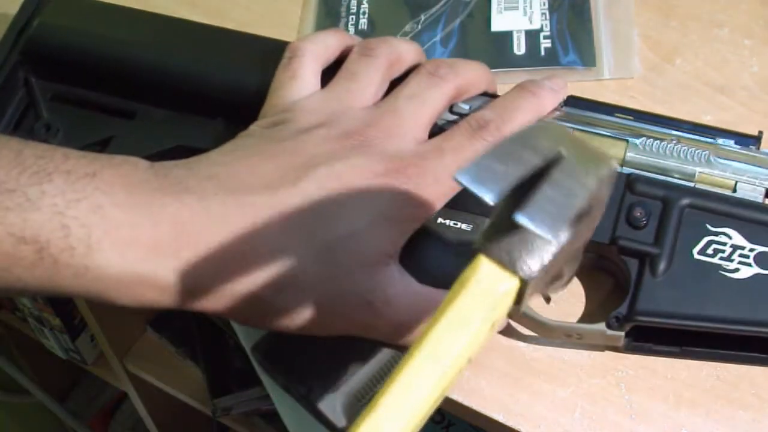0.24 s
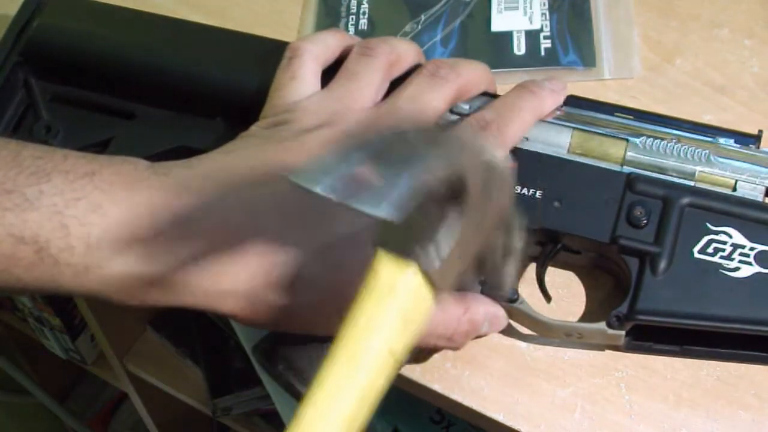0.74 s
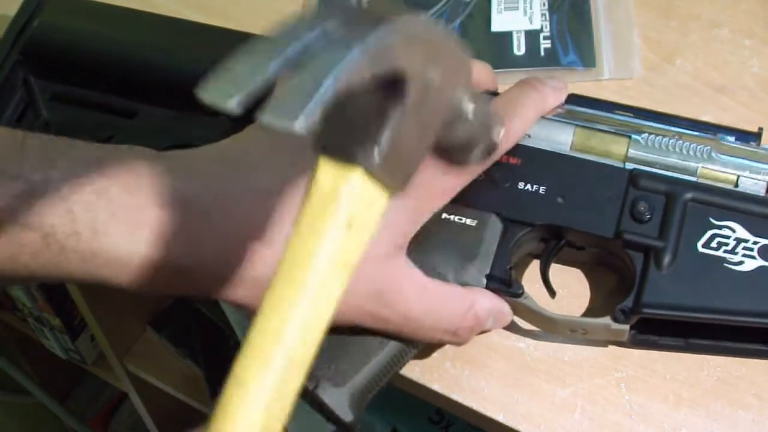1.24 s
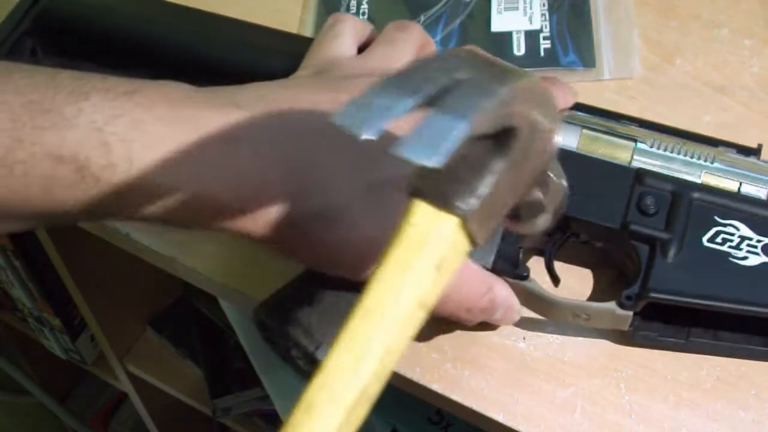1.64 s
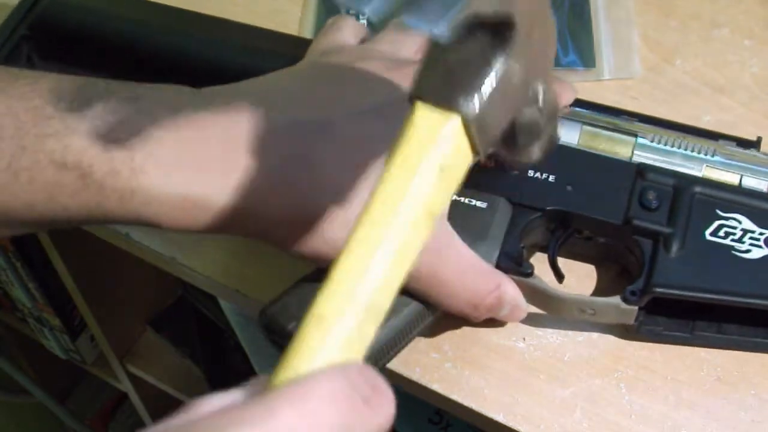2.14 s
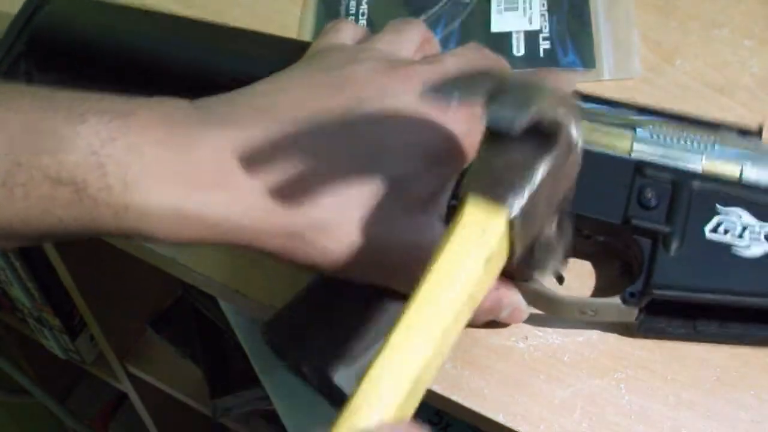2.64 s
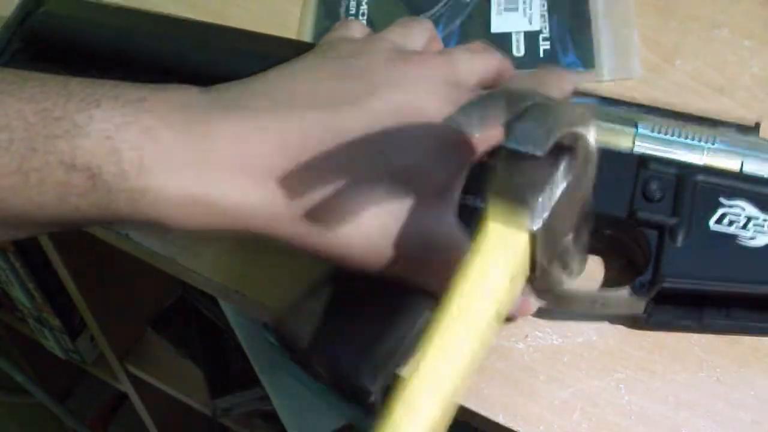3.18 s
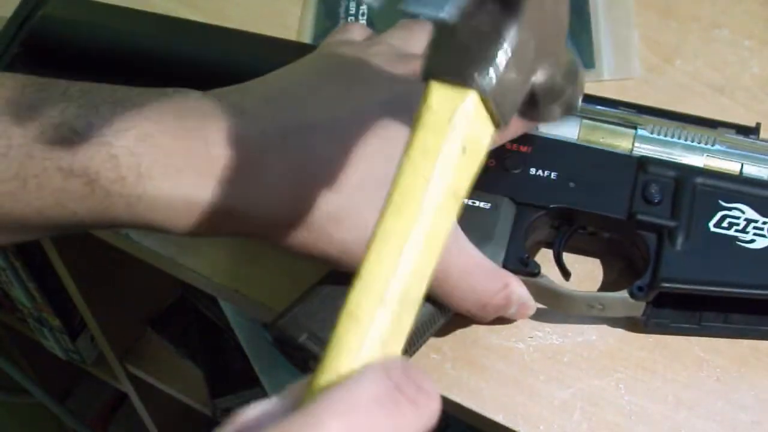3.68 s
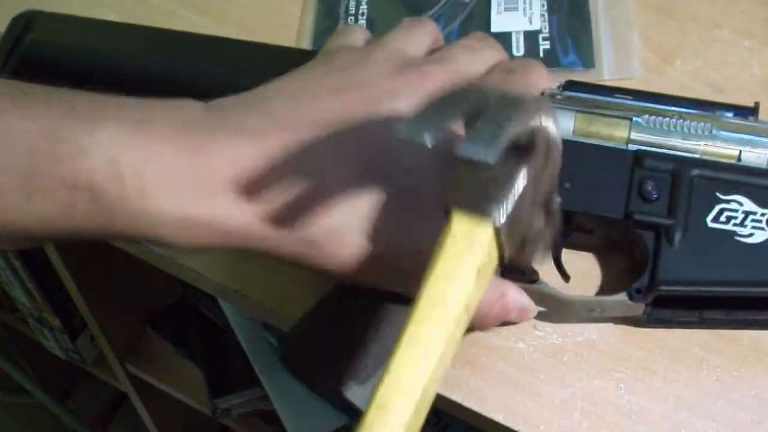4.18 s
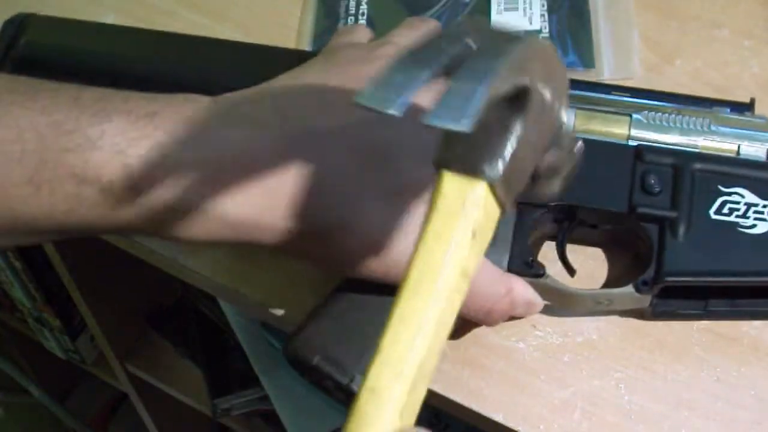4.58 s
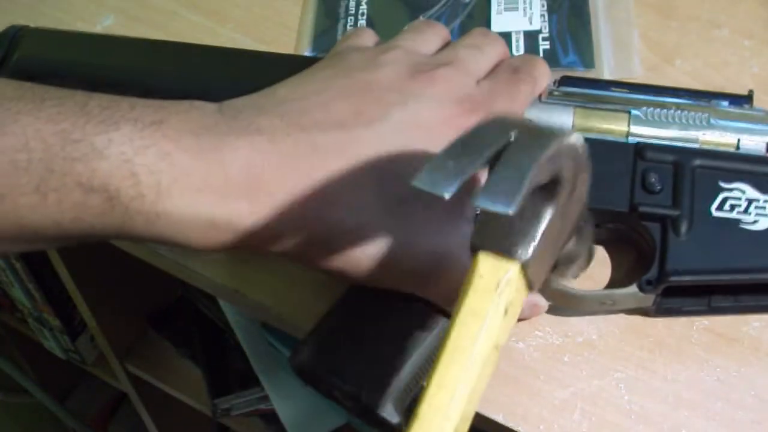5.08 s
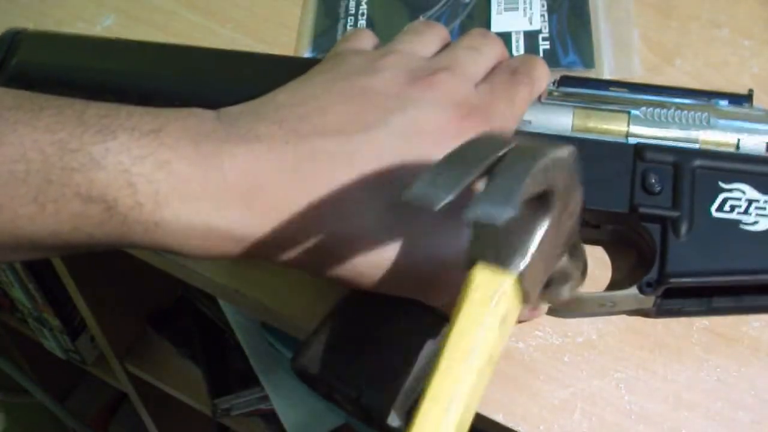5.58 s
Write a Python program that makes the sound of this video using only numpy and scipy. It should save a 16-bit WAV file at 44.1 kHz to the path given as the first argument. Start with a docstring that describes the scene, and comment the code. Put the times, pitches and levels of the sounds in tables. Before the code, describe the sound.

A hammer drives a steel pin into a plastic housing held on a wooden workbench. Each blow is a hard steel tick, a plastic clack and a short bench thump, with a thin metal ring, a chatter of loose parts and a faint knock as the housing lands again.

Four blows fall at about 0.4, 0.7, 1.0 and 1.4 seconds, the third strongest. In a short pause, a hand softly rubs and nudges the housing. From 1.9 seconds the hammering resumes lightly and keeps steady at about three blows a second, growing firmer and more ringing between 3.1 and 4.4. A soft nudge precedes the two hardest strikes, at 4.7 and 4.9. Three more follow, easing slightly, the last at 5.8.

The microphone is close and overloads on the blows. The room is small, with a short echo and a faint hum.

```python
"""Hammering a pin into plastic

A claw hammer drives a steel pin into a plastic housing that a hand holds down on a wooden bench.
Each blow is a steel tick, a clack of the housing and a thump of the bench top. Metal rings, loose
parts chatter, and the housing hops and lands again. Now and then the hand rubs and nudges it.
The room is small and hums faintly; the blows overload the close microphone."""
import sys
import numpy as np
from scipy import signal
from scipy.fft import rfft, irfft
from scipy.io import wavfile

SR = 44100
rng = np.random.default_rng(int(sys.argv[2]) if len(sys.argv) > 2 else 0)


def to_wav(sig):
    """Store sig (one row per channel, or 1-D mono) as 16-bit WAV at the path in sys.argv[1].

    Samples outside -1..1 are clipped; the rate is SR.
    """
    pcm = np.clip(np.atleast_2d(sig), -1, 1) * 32767
    pcm = np.round(pcm).astype(np.int16)
    wavfile.write(sys.argv[1], SR, pcm.T)  # frames by channels


N = 256662
T = np.arange(SR // 4) / SR  # seconds within one blow

# The hammer blows. Drive is the shove into the housing; hop is the time until it lands again.
# start_s, force_db, drive_db, metal_ring_db, thump_pitch_hz, hop_s, landing_db
BLOWS = [(0.4257, -5.5, -3, -41.5, 113.7, 0.039, -37.5), (0.7170, -2.5, 3.5, -45.5, 104, 0.065, -27),
         (1.0315, 2, 6.5, -39.5, 107, 0.086, -29.5), (1.3575, -4, -1.5, -32.5, 94.2, .053, -26),
         (1.9172, -5.5, -5, -49, 110.5, 0.048, -32), (2.234, -4.5, -4.5, -41.5, 108.5, 0.077, -26.5),
         (2.5328, -2, -2.5, -39, 112, 0.087, -28), (2.829, -4.5, -1.5, -34, 113, 0.082, -30.5),
         (3.136, 0.5, -2, -32, 114.4, 0.075, -29), (3.4425, -0.4, -1.9, -28.5, 118, 0.071, -28),
         (3.77, .5, -2.4, -28, 116.7, 0.048, -37.5), (4.0870, 1.1, -8, -29, 100.2, .051, -26),
         (4.3714, 1.5, -7.5, -28, 124, 0.044, -26), (4.6689, 8.5, 5.5, -41.5, 100.7, 0.051, -29.5),
         (4.9465, 10.5, 7.5, -37, 103.4, 0.047, -28), (5.212, 4.5, 7, -36, 108, .05, -33),
         (5.4908, 2.3, 5.5, -39, 101.5, 0.041, -37), (5.7767, 1.5, 3, -35, 99.5, .05, -31)]


def hammering():
    """The hammer strikes the pin, and the blow travels through the housing into the bench."""
    # The housing clacks as the pin shoves it, then as it is pressed onto the bench: delay_s, level_db
    clacks = [(.0007, -3), (.0055, -3)]
    out = np.zeros(N)
    for start_s, force_db, drive_db, metal_db, pitch_hz, _, _ in BLOWS:
        thump_s = 0.012 * np.exp(-0.012 * drive_db)  # more drive, shorter thump
        bench = thump(thump_level(force_db, drive_db), pitch_hz, thump_s)
        loose = clatter(-23.5 + force_db + 0.45 * drive_db)
        add(out, start_s, tick(force_db - 8) + jingle(metal_db + 7.5) + loose + bench)
        for delay_s, level_db in clacks:
            add(out, start_s + delay_s, clack(drive_db + level_db - 6, tilt=0.1 * drive_db))
    return out


def tick(level_db, chatter=0.25, chatter_s=0.016):
    """Steel meets steel: one hard contact and a few milliseconds of chatter on the pin."""
    # Tone of steel on steel: pitch_hz, level_db
    steel_tone = [(200, -13), (450, 4.5), (900, 3), (1900, 1), (2600, 9.5), (3200, 0), (4000, -25.5),
                  (5000, -17.5), (5700, -7.5), (7600, 3), (9300, -13), (12000, -16), (16000, -15.5)]
    contact = chatter * rng.standard_normal(len(T)) * dying(chatter_s)
    contact[0] += 1
    return levelled(signal.fftconvolve(contact, click(steel_tone))[:len(T)], level_db, samples=130)


def clack(level_db, tilt, rasp=0.78, rasp_s=0.052, ring_s=0.038, rise_s=0.0024):
    """The housing rings briefly, its tones shifting a little with the grip, and the sliding pin rasps."""
    # Tones of the plastic housing: pitch_hz, level_db
    housing_tones = [(232, -1.5), (345, -0.5), (495, 3.5), (600, 1.5), (890, -6.5), (1020, -3), (1180, -6),
                     (1390, -20), (1535, -17), (1712, -15), (2050, 0.5), (2320, 3), (2680, -7.5),
                     (3050, -7.5), (3600, -15), (4500, -20.5)]
    # Plastic scraping on steel: pitch_hz, level_db
    scrape_tone = [(120, -14.5), (400, 0), (900, -8), (1400, -5.5), (2500, -3.5), (3200, -16.5),
                   (4300, -23.5), (16000, -40.5)]
    ring = np.zeros(len(T))
    for pitch_hz, tone_db in housing_tones:
        detune, uneven_db = rng.standard_normal(2) * (0.013, 4)
        phase = pitch_hz * (1 + detune) * T + rng.random()
        ring += amp(tone_db + uneven_db) * np.sin(2 * np.pi * phase)
    ring = evened(tilted(ring, tilt)) * dying(ring_s)
    slide = evened(tilted(noise(scrape_tone, len(T)), tilt)) * dying(rasp_s)
    fade_in = 1 - np.exp(-(T / rise_s) ** 2)
    return levelled((ring + rasp * slide) * fade_in, level_db, samples=600)


def jingle(level_db, haze_s=0.135, ring_s=0.16):
    """Metal parts ring: a few clear tones that shift with how the pin sits, over a haze of many more."""
    # Tones of the steel pin and spring: pitch_hz, level_db
    steel_tones = [(5420, -4.5), (5720, -4.5), (5900, -4.5), (6100, -5.5), (7600, -1), (7950, -1),
                   (8270, -2)]
    # The haze of close-packed metal tones: pitch_hz, level_db
    haze_tone = [(1500, -18), (2500, -4), (3500, -11), (4700, -19.5), (5350, -1.5), (5850, -2), (6500, -2),
                 (7200, -2), (8150, 5), (9200, -7), (11000, -6), (13000, -14), (16000, -20)]
    ring = np.zeros(len(T))
    for pitch_hz, tone_db in steel_tones:
        shifted_hz = pitch_hz * (1 + 0.0019 * rng.standard_normal())
        ring += amp(tone_db) * np.sin(2 * np.pi * (shifted_hz * T + rng.random()))
    haze = noise(haze_tone, len(T)) * dying(haze_s)
    return amp(level_db) * (haze + amp(-6) * evened(ring) * dying(ring_s))


def thump(level_db, pitch_hz, length_s):
    """The bench top is pushed down, swings briefly under the hand, then rings on faintly."""
    # Tones the bench rings on with: pitch_hz, level_db, fade_s
    bench_tones = [(35, -30, .25), (68.1, -17, 0.31), (76.3, -18, .31), (134.1, -20, .24),
                   (228, -21.5, .08), (346.7, -17, 0.11)]
    progress = T / length_s
    push = 2 * progress ** 1.46 * np.exp(-progress ** 2) * np.cos(2 * np.pi * pitch_hz * (T - 0.001))
    ring = sum(amp(db) * dying(fade_s) * np.sin(2 * np.pi * hz * T) for hz, db, fade_s in bench_tones)
    return levelled(push + ring, level_db, samples=600)


def thump_level(force_db, drive_db):
    """The bench thump's level in dB grows with both the force and the drive of a blow."""
    return -8 + 0.3 * force_db + 0.3 * drive_db


def clatter(level_db, contacts_per_s=2500, fade_s=0.19, rise_s=0.007):
    """Loose parts bounce inside the housing in a dying shower of tiny contacts."""
    # Tone of one tiny contact: pitch_hz, level_db
    contact_tone = [(150, -14.5), (450, 3.5), (900, -2.5), (1500, -4.5), (2400, 4), (3100, -2.5),
                    (3800, -12.5), (4600, -26), (8000, -29), (16000, -46)]
    contacts = rng.standard_normal(len(T)) * (rng.random(len(T)) < contacts_per_s / SR)
    shower = signal.fftconvolve(contacts, click(contact_tone))[:len(T)]
    return levelled(shower * dying(fade_s) * (1 - np.exp(-T / rise_s)), level_db, samples=3000)


def landing():
    """The housing hops after each blow and drops back on the bench, more sharply after a forceful one."""
    out = np.zeros(N)
    for start_s, force_db, drive_db, metal_db, _, hop_s, landing_db in BLOWS:
        thump_db = thump_level(force_db, drive_db) - 16.2
        drop = knock(landing_db, tilt=0.78 + 0.5 * force_db, metal_db=metal_db - 12, thump_db=thump_db)
        add(out, start_s + hop_s, drop)
    return out


def knock(level_db, tilt, metal_db, thump_db, rise_s=0.0025):
    """The housing meets the bench with a soft-edged knock."""
    # A soft contact of plastic on wood passes little treble: pitch_hz, gain_db
    cushion = [(20, 2), (3500, 0), (8500, 0), (10500, -15.5), (16000, -29)]
    plastic = clack(level_db + 3, tilt, rasp=2.2, rasp_s=0.055)
    metal = jingle(metal_db, haze_s=0.065, ring_s=0.08)
    bench = thump(thump_db, pitch_hz=120, length_s=0.01)
    contact = (plastic + metal + bench) * (1 - np.exp(-T / rise_s))
    return signal.fftconvolve(contact, click(cushion))


def nudging():
    """Dull knocks as the hand sets the housing straight."""
    # Nudges between blows: start_s, level_db
    nudges = [(0.171, -43), (1.542, -38), (1.781, -48.5), (2.178, -46.5), (4.594, -44), (4.642, -28.5)]
    out = np.zeros(N)
    for start_s, level_db in nudges:
        add(out, start_s, knock(level_db, tilt=-5.5, metal_db=level_db - 27, thump_db=level_db - 6.2))
    return out


def rubbing():
    """Skin slides over the plastic in short dull swells as the hand changes its grip."""
    # The rubs: start_s, length_s, level_db
    rubs = [(0.153, 0.099, -41.5), (1.531, 0.13, -44), (1.74, 0.073, -45.5), (2.166, 0.15, -44.5),
            (4.514, 0.12, -46)]
    # Tone of skin on plastic: pitch_hz, level_db
    skin_tone = [(60, -7), (150, -4.5), (400, -2.5), (700, -22), (2000, -28), (5000, -47), (16000, -57)]
    out = np.zeros(N)
    for start_s, length_s, level_db in rubs:
        samples = round(length_s * SR)
        add(out, start_s, amp(level_db) * noise(skin_tone, samples) * np.hanning(samples))
    return out


def workbench():
    """All the sound the work sends in one direction; the fine detail differs with each call."""
    return hammering() + landing() + nudging() + rubbing()


def room(sound, echo_db=-12):
    """Dense echoes from the walls build up and die away, each pitch at its own pace."""
    # Time the echoes take to build up: pitch_hz, rise_s
    rise_times = [(130, 0.012), (300, 0.0027), (1500, 0.005), (8000, 0.011)]
    # Time they take to die away: pitch_hz, fade_s
    fade_times = [(90, 0.26), (250, 0.22), (700, 0.27), (2500, 0.33), (3700, .28), (4700, .19),
                  (5900, 0.21), (8000, 0.26), (14000, 0.089)]
    # Tone of the echoes: pitch_hz, gain_db
    echo_tone = [(40, -1.5), (85, 2), (135, -0.5), (180, -2.5), (240, 5.5), (450, -1), (800, 2), (1400, -4),
                 (2500, -9.5), (4500, -4), (5900, 2), (8000, -15), (15000, -12.5)]
    hz, t, bands = signal.stft(rng.standard_normal(SR // 2), SR, nperseg=512)
    rise = 1 - np.exp(-(t / read(rise_times, hz)[:, None]) ** 2)
    fall = np.exp(-np.log(1000) * t / read(fade_times, hz)[:, None])
    tail = signal.istft(bands * rise * fall, SR, nperseg=512)[1]
    tail = signal.fftconvolve(tail / np.linalg.norm(tail), click(echo_tone))
    return amp(echo_db) * signal.fftconvolve(sound, tail)[:N]


def background(air_db=-41.5):
    """Still air, mains hum and a thin electronic whine."""
    # The quiet room and the microphone's hiss: pitch_hz, level_db
    air_tone = [(20, 1), (45, -7.5), (110, -17), (180, -21), (400, -26.5), (800, -34.5), (2200, -38.5),
                (4000, -48.5), (9500, -47.5), (11000, -44), (12500, -56), (14500, -52), (15500, -77.5)]
    # Mains hum: pitch_hz, level_db
    hum = [(59.5, -43), (119, -53.5)]
    # Electronic whine: pitch_hz, level_db
    whine = [(9012, -75), (9082, -75), (11364, -66)]
    t = np.arange(N) / SR
    tones = sum(amp(db) * np.sin(2 * np.pi * (hz * t + rng.random())) for hz, db in hum + whine)
    return tones + amp(air_db) * noise(air_tone, N)


def amp(db):
    """Turns decibels into a number to multiply by."""
    return 10 ** (np.asarray(db) / 20)


def evened(sound):
    """Scales a sound to an average (rms) level of 1."""
    return sound / np.sqrt(np.mean(sound ** 2) + 1e-20)


def levelled(sound, level_db, samples):
    """Scales a sound so that its first samples average level_db."""
    return amp(level_db) * sound / np.sqrt(np.mean(sound[:samples] ** 2))


def dying(fade_s):
    """A fade that is 60 dB down after fade_s."""
    return np.exp(-np.log(1000) * T / fade_s)


def tilted(sound, tilt):
    """Brightens a sound by tilt dB per octave around 1 kHz, as a harder contact does; below 0 it dulls."""
    octaves = np.log2(np.clip(np.fft.rfftfreq(len(sound), 1 / SR), 250, 4000) / 1000)
    return irfft(rfft(sound) * amp(tilt * octaves), len(sound))


def read(table, hz):
    """Looks up a pitch in a table, gliding between its rows."""
    pitches, values = np.transpose(table)
    return np.interp(np.log(hz + 1), np.log(pitches), values)


def noise(tone, samples):
    """Noise shaped by a tone table, at an average level of 1."""
    gain = amp(read(tone, np.fft.rfftfreq(samples, 1 / SR)))
    return evened(irfft(rfft(rng.standard_normal(samples)) * gain, samples))


def click(tone, samples=2048):
    """The shortest click with the given tone table; it also serves as a filter."""
    log_gain = np.log(amp(read(tone, abs(np.fft.fftfreq(samples, 1 / SR)))))
    return np.fft.ifft(np.exp(np.conj(signal.hilbert(log_gain)))).real


def add(mix, start_s, sound):
    """Mixes a sound in at start_s."""
    part = mix[max(round(start_s * SR), 0):][:len(sound)]
    part += sound[:len(part)]


def scene(directions=4):
    """The direct sound, the sound sent other ways coming back from the walls, and the background."""
    echoes = sum(room(workbench()) for _ in range(directions)) / np.sqrt(directions)
    return (workbench() + echoes + background())[None]


def record(dry, threshold_db=-18, recovery_db_per_s=55, cut_share=0.45, ceiling=0.88, top_hz=15950):
    """Automatic volume dips after each blow, too late to stop the clipping; the top treble is lost."""
    # Treble loss of the recorder: pitch_hz, gain_db
    treble_loss = [(20, 2.5), (8000, 0), (12500, 1), (14500, -4), (16000, -12)]
    power = signal.lfilter([1 / 400], [1, 1 / 400 - 1], dry[0] ** 2)  # smoothed over 400 samples
    power_db = 10 * np.log10(power + 1e-12)
    recovery_db = np.arange(N) * recovery_db_per_s / SR
    held_db = np.maximum.accumulate(power_db + recovery_db) - recovery_db  # each peak sinks slowly
    excess_db = np.maximum(held_db - threshold_db, 0)
    late_db = signal.lfilter([1 / 500], [1, 1 / 500 - 1], excess_db)  # lags by about 500 samples
    clipped = np.clip(dry * amp(-cut_share * late_db), -ceiling, ceiling)
    dulled = signal.oaconvolve(clipped, click(treble_loss)[None])[:, :N]
    low_pass = signal.firwin(255, top_hz, window=("kaiser", 9), fs=SR)
    return signal.oaconvolve(dulled, low_pass[None], "same")


dry = scene()
out = record(dry)
to_wav(out)
```